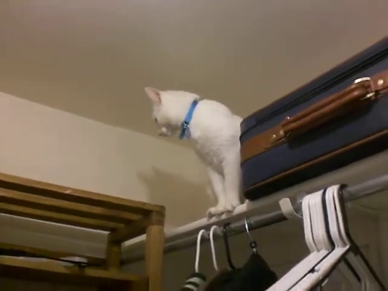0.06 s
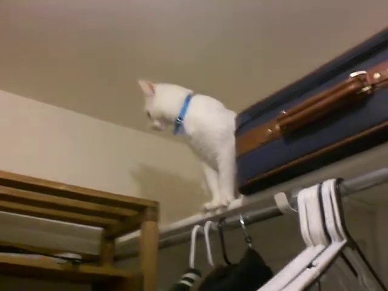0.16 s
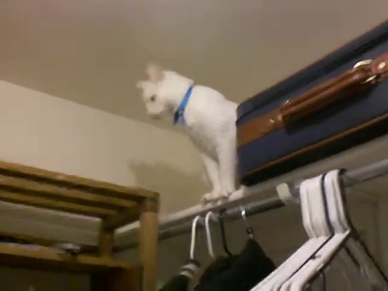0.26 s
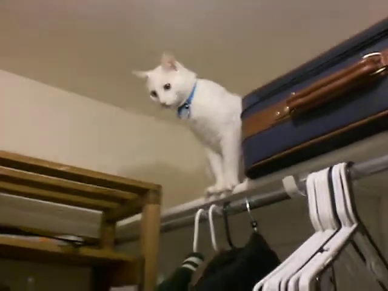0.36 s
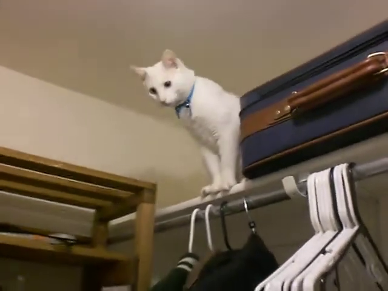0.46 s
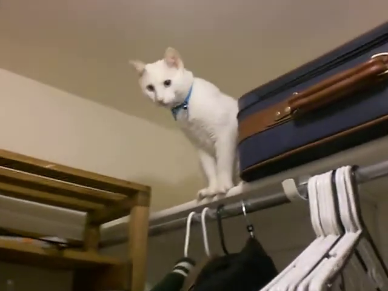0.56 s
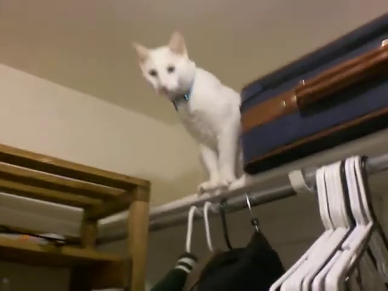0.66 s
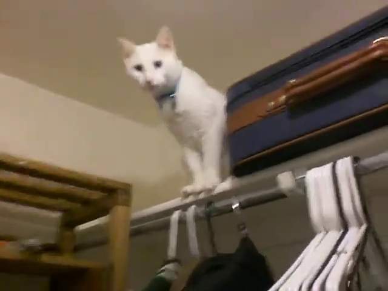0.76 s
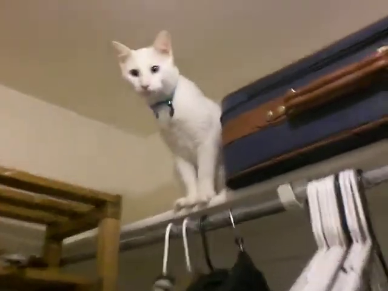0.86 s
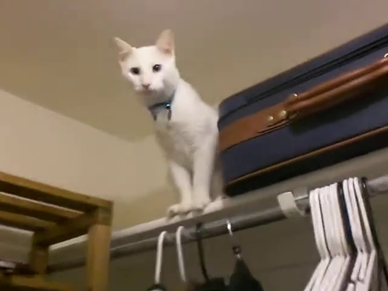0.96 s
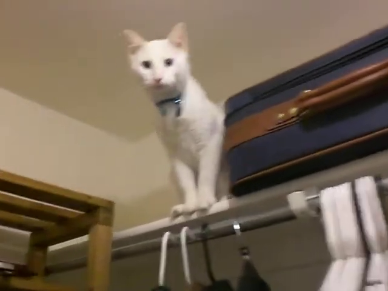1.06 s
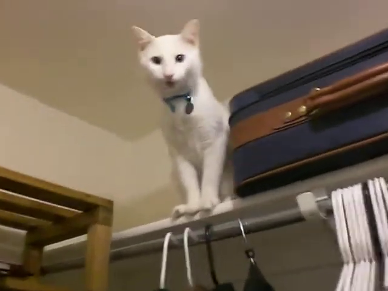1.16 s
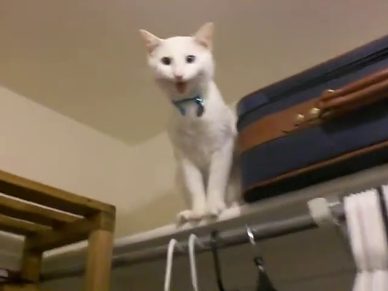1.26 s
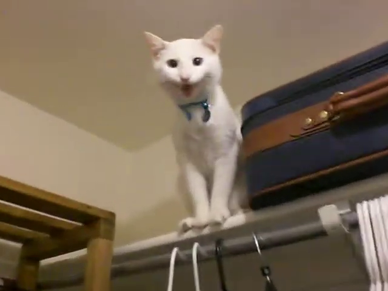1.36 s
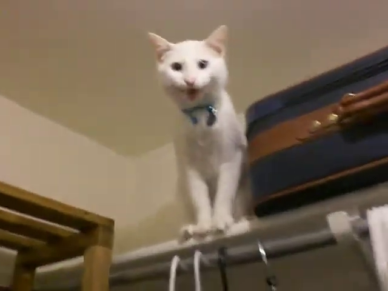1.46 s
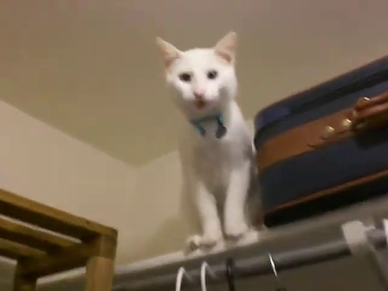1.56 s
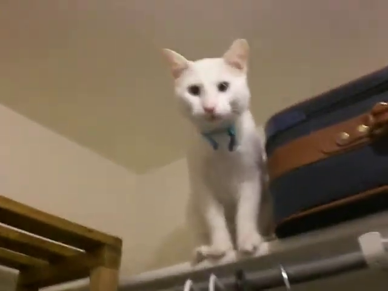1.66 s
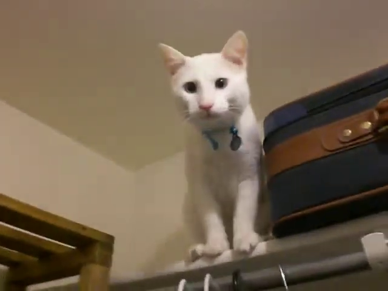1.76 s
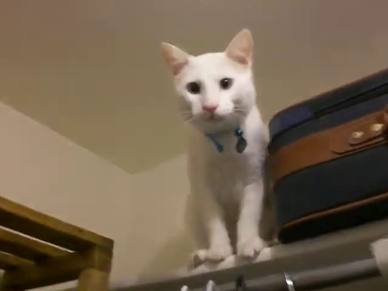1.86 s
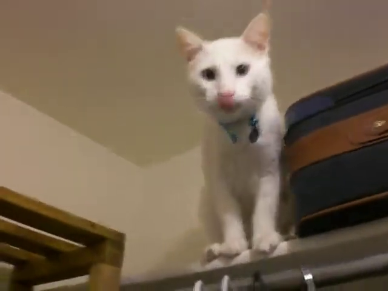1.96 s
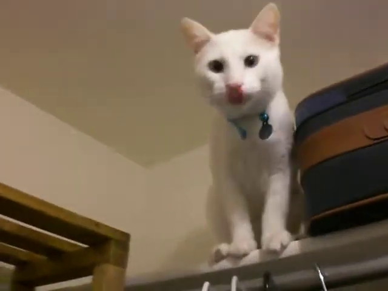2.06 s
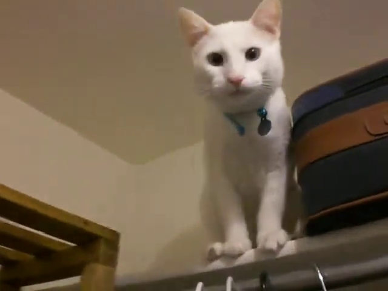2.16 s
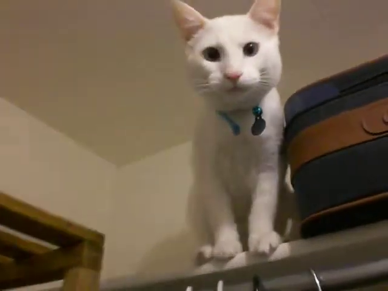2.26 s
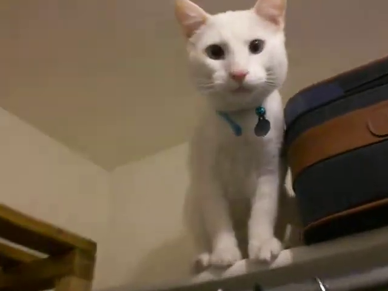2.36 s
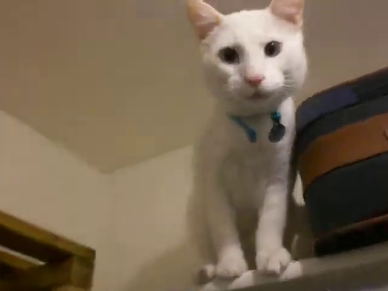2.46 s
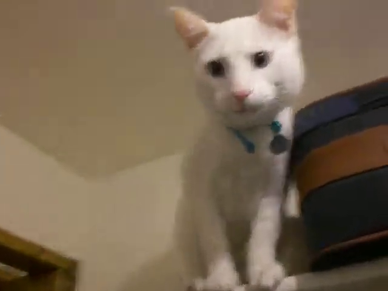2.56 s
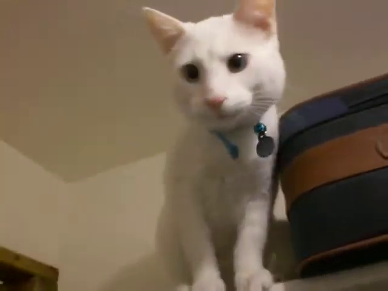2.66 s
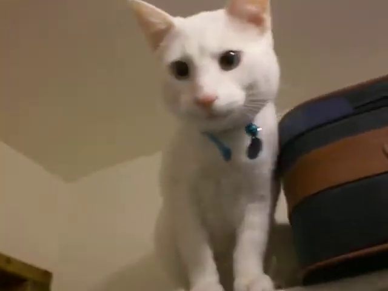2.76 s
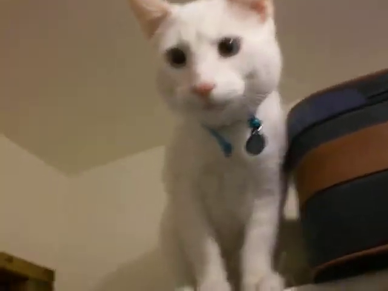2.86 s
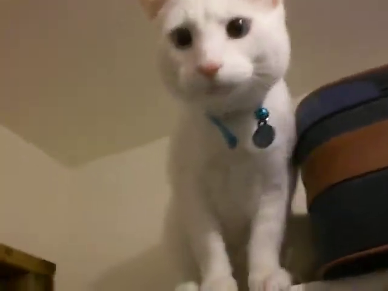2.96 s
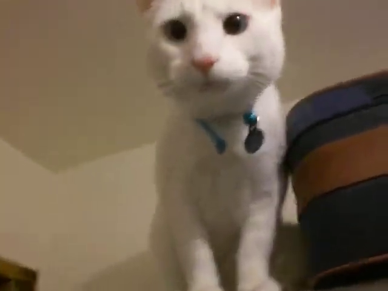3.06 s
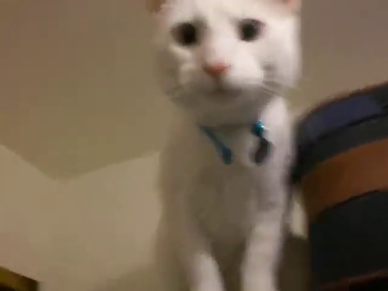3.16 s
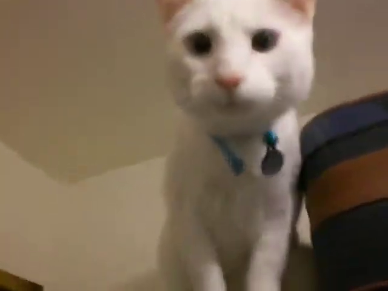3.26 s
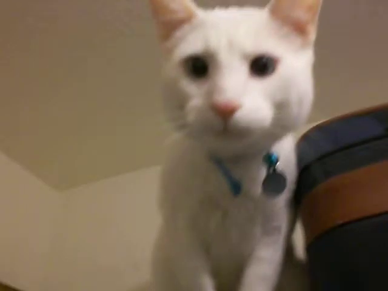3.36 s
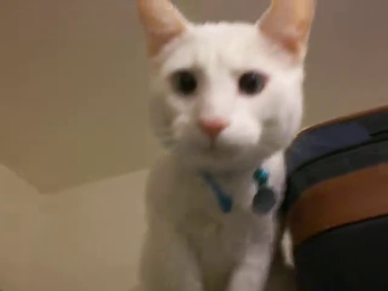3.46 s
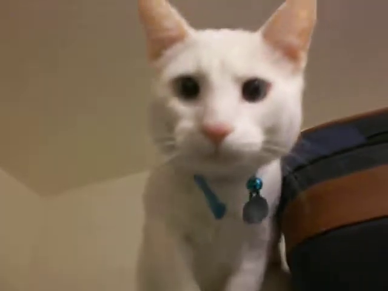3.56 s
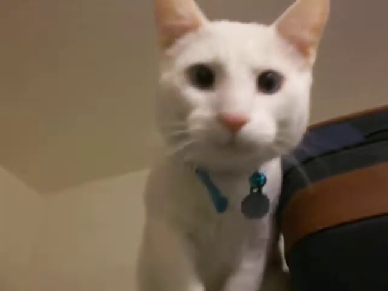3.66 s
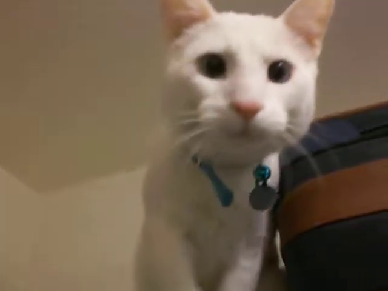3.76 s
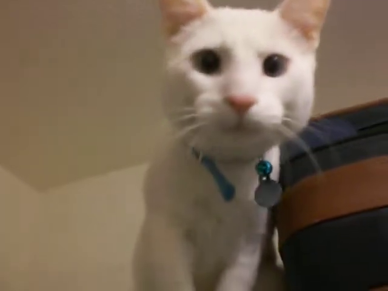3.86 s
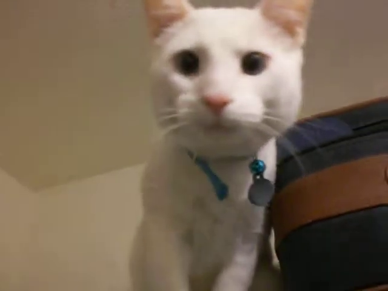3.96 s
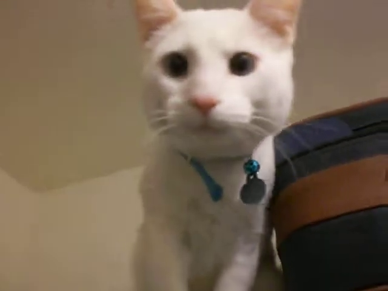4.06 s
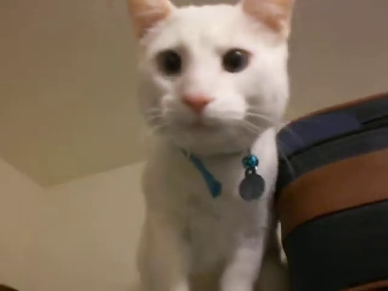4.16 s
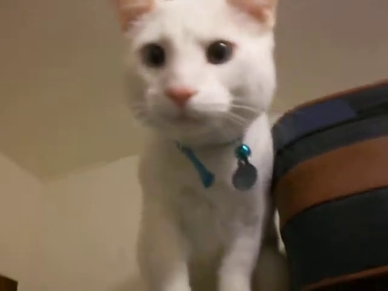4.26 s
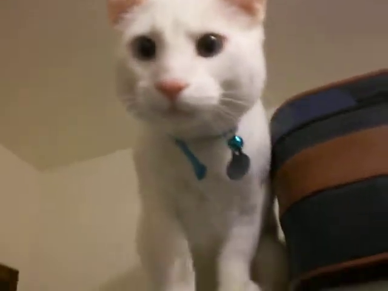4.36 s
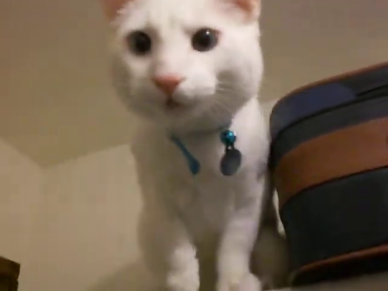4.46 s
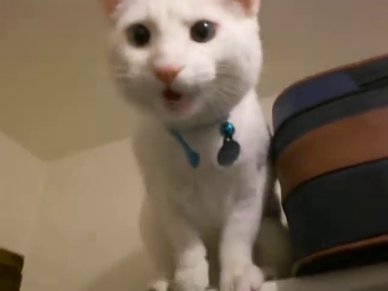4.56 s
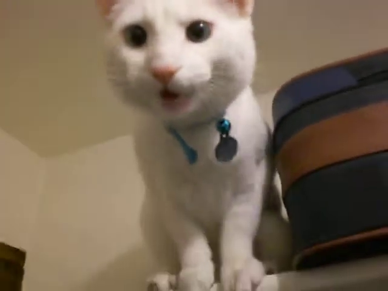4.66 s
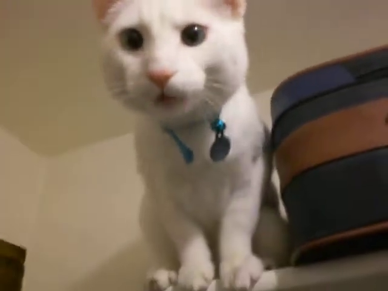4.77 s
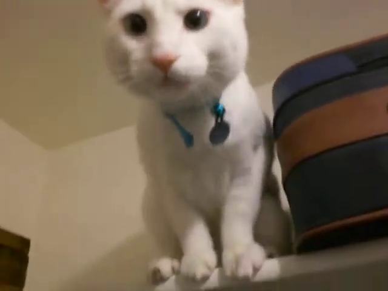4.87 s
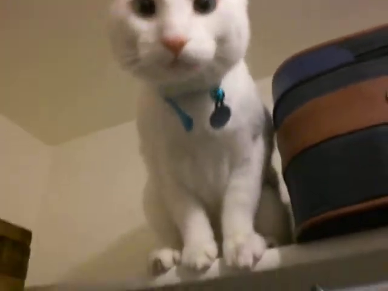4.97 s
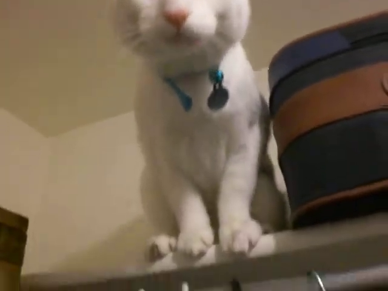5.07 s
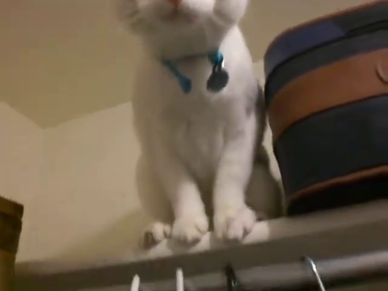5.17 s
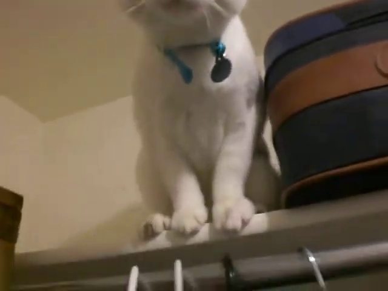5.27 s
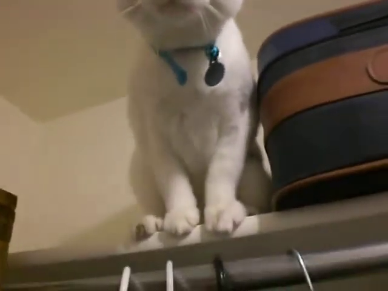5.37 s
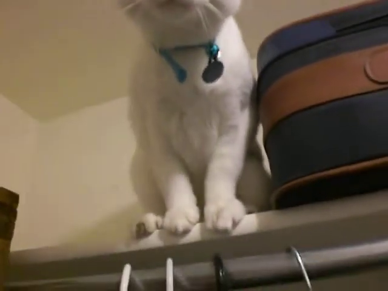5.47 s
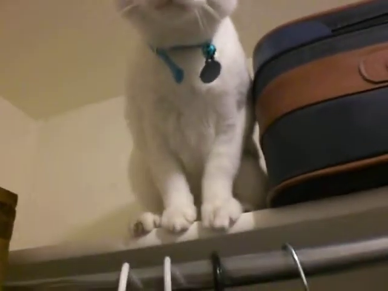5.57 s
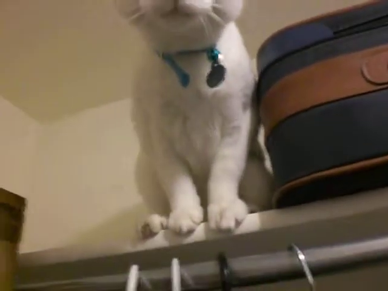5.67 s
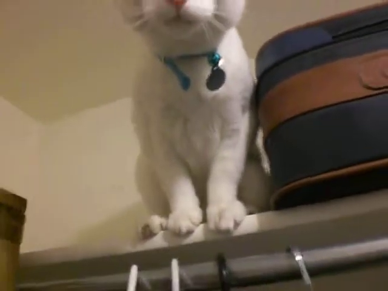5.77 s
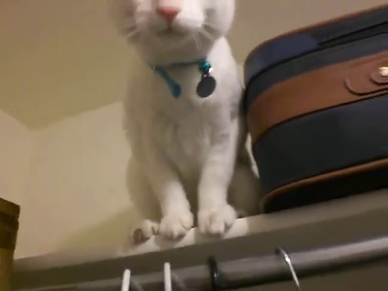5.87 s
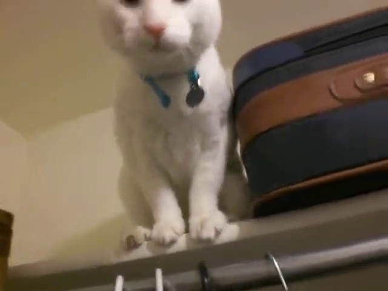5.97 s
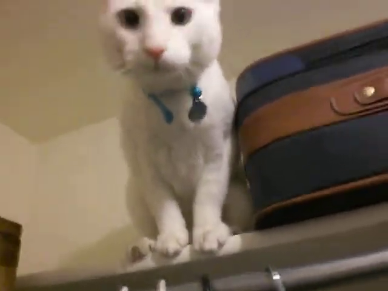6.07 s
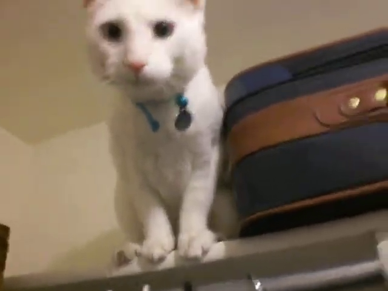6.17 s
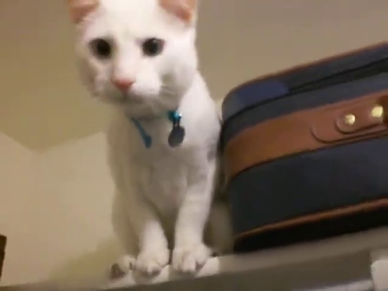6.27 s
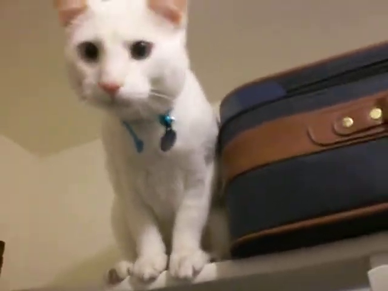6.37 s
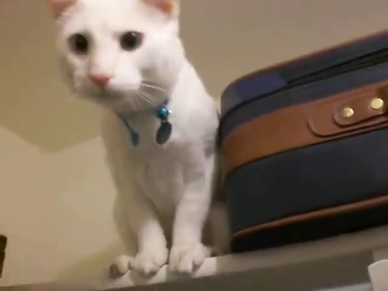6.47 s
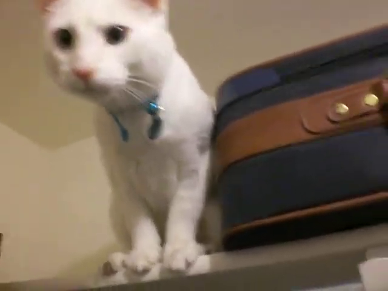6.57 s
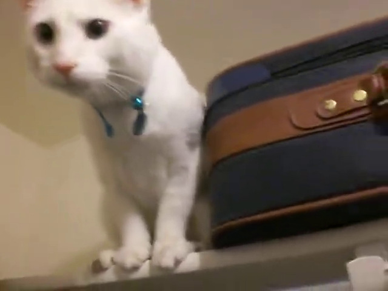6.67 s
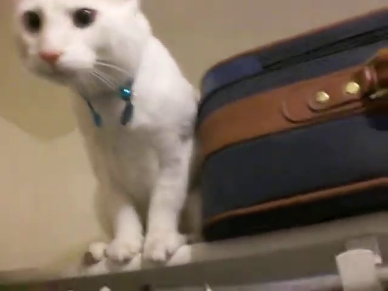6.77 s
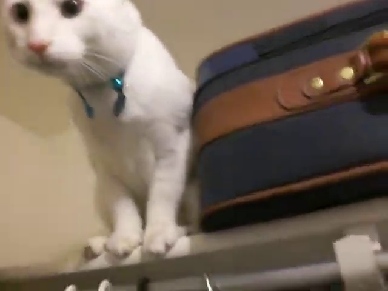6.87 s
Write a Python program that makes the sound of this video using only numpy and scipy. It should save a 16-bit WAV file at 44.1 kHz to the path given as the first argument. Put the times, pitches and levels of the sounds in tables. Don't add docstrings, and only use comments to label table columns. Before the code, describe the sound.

Quiet hiss and a very thin, high electronic whine hold throughout, in a small closet with close, short reflections. At about 1.15 s a faint lip smack leads into a high, clear meow from 1.2 to 1.8 s; it starts strong, drops quickly, levels, then slides down and turns breathy as the mouth closes, with a soft wet smack. A dull low bump sits near 1.7 s. From 2.1 to 2.8 s come light hand slides on the casing, small moist smacks, soft bumps and a dry tick at 2.7 s. Hiss alone follows until 4.4 s, when wet smacks and sharp clicks open the second meow; it begins softly, rises to a bright, full middle, and falls until 5.0 s, ending with two smacks. A tiny tap follows at 5.15 s. Around 5.8 to 6.0 s the hand rubs more strongly with low thuds, then only hiss and whine remain.

```python
import sys
import numpy as np
from scipy import signal
from scipy.fft import rfft, irfft
from scipy.io import wavfile
from scipy.ndimage import uniform_filter1d

SR = 44100
rng = np.random.default_rng(int(sys.argv[2]) if len(sys.argv) > 2 else 0)


def level_to_linear(level):
    exponent = np.asarray(level, float) / 20
    return 10 ** exponent


def generate_wav(sig):
    pcm = np.round(np.clip(np.atleast_2d(sig).T, -1, 1) * 32767).astype(np.int16)
    wavfile.write(sys.argv[1], SR, pcm)


N = 305613
TIME = np.arange(N) / SR


def at_hz(points, hz):
    point_hz, level_db = np.transpose(points)
    return np.interp(np.log(hz), np.log(point_hz), level_db)


def rms_one(x):
    return x / np.sqrt(np.mean(x ** 2) + 1e-20)


def drift(rate, size):
    r = np.exp(-2 * np.pi * rate / SR)
    wander = signal.lfilter([1], [1, -2 * r, r * r], rng.standard_normal(size + 4000))
    return rms_one(wander[4000:])


def resonance(x, hz, width):
    r = np.exp(-np.pi * width / SR)
    ring = [1, -2 * r * np.cos(2 * np.pi * hz / SR), r * r]
    return signal.lfilter(np.array([1, 0, -1]) * (1 - r * r) / 2, ring, x)


# (time [s], pitch [Hz])
PITCHES = [
    [(1.19, 808), (1.232, 707), (1.27, 698.8), (1.39, 716), (1.495, 706.6), (1.515, 692), (1.62, 671.2),
     (1.745, 599), (1.83, 474.6)],
    [(4.4, 635), (4.44, 642), (4.49, 620.7), (4.57, 693.7), (4.635, 711), (4.66, 702), (4.735, 697),
     (4.88, 625.7), (5.0, 529)],
]
# (time [s], effort [dB], leaking breath [dB])
EFFORTS = [
    [(1.19, -45.5, -30), (1.24, -54.5, -11), (1.3, -47.5, -24.5), (1.41, -44.5, -27), (1.49, -42.5, -24),
     (1.51, -45.5, -25), (1.535, -42, -34), (1.7, -47.5, -14), (1.83, -57.5, -11)],
    [(4.4, -73, -24), (4.43, -53, -22), (4.535, -47.5, -16), (4.6, -46.5, -29), (4.637, -44.5, -23),
     (4.655, -44.5, -32), (4.735, -47.5, -25), (4.8, -46.5, -24), (4.995, -55.5, -22)],
]
# (time [s], mouth opening [0-1])
JAWS = [
    [(1.19, 0.24), (1.21, 0.57), (1.225, 0.93), (1.255, 0.95), (1.32, 1), (1.6, 0.78), (1.7, 0.64),
     (1.76, 0.5), (1.83, 0)],
    [(4.4, .02), (4.47, 0.3), (4.529, 0.1), (4.533, 0.81), (4.58, 1), (4.74, 0.99), (4.82, 0.85),
     (4.9, 0.8), (5.0, 0.33)],
]
# (frequency [Hz], level [dB])
LOW_COLOURS = [
    [[(450, -4), (540, 5.5), (552, -6), (590, 0.5), (648, -9.5), (673, -17.5), (699, -7), (714, 0)],
     [(1000, -14), (1150, 7), (1200, 1), (1275, -17), (1320, -0.5), (1353, -16), (1385, -4), (1470, -9)],
     [(1600, 8.5), (1900, 1.5), (1970, 6.5), (2025, 6.5), (2060, 11.5), (2140, 6.5), (2200, -7), (2350, 7)]],
    [[(530, 2), (560, 2.5), (590, -3), (617, -7.5), (650, -0.5), (700, 0), (713, 2.5)], [(1070, 5),
     (1110, 6), (1250, -1), (1336, -10), (1390, -4), (1430, -0.5)], [(1600, 8), (1800, 1), (1920, -4),
     (1970, 9.5), (2035, 8), (2075, 10), (2112, 12.5), (2133, 6.5)]],
]
# (frequency [Hz], width [Hz], level when shut [dB], level when open [dB])
MOUTHS = [
    [(3710, 680, 14, 13), (4055, 60, -1, 10), (3353, 69, -13, -22), (5000, 67, -5, 7.5),
     (6000, 150, -12, -3)],
    [(4300, 570, 19, 7.5), (4295, 62, -8, 10.5), (5330, 144, 64, -7), (5300, 150, -9, 1),
     (4720, 99, 30, 3.5)],
]
# (frequency [Hz], level [dB])
THROATS = [
    [(1900, 19), (2800, 8), (3500, 2.5), (4200, -0.5), (4900, 4), (5600, 0.5), (6300, -4.5), (7000, -0.5),
     (7800, -12), (8600, -8), (9600, -9), (10800, -11), (12500, -17), (15000, -32)],
    [(1900, 3), (2800, 10), (3500, -4.5), (4200, -3.5), (4900, -5), (5700, -3), (6300, 3.5), (7000, -3.5),
     (7800, -3), (8600, -7), (9600, -9.5), (10800, -8), (12500, -23), (15000, -15)],
]
SHUT_LOSS_DB = (.1, 8, 25, 36)
UPPER_DB, BRIGHT_DB = -15, -1.5
LEAST_BREATH_DB = -40
ATTACK_S, RELEASE_S = .006, 0.0093
WAVER_DB = 1.5
SHELF_ECHO, SWAYS_PER_S = 0.51, 4.5


def meow(pitches, efforts, jaw, colours, mouth, throat):
    s, effort_db, breath_db = np.transpose(efforts)
    first, last = round(s[0] * SR), round(s[-1] * SR)
    t = TIME[first:last]
    size = len(t)
    effort_db = np.interp(t, s, effort_db)
    breath_db = np.interp(t, s, breath_db)
    shut = 1 - np.interp(t, *np.transpose(jaw))
    pitch = uniform_filter1d(np.interp(t, *np.transpose(pitches)), size=700)

    low = []
    for k, colour in enumerate(colours, 1):
        waver_db = WAVER_DB / k * drift(30, size)
        low.append(at_hz(colour, k * pitch) - SHUT_LOSS_DB[k - 1] * shut + waver_db)

    pitch = pitch * (1 + 0.00337 * drift(60, size))
    turn = 2 * np.pi * np.cumsum(pitch) / SR

    orders = np.arange(4, 22)[:, None]
    upper_hz = orders * pitch
    tilt = BRIGHT_DB * np.log2(np.minimum(orders, 10) / 6)
    upper = UPPER_DB - SHUT_LOSS_DB[-1] * shut + at_hz(throat, upper_hz) + tilt
    for hz, width, shut_db, open_db in mouth:
        peak_db = open_db + (shut_db - open_db) * shut
        upper = upper + peak_db / (1 + ((upper_hz - hz) / width) ** 2)
    sway = np.array([np.pi / 16 * min(k, 6) * drift(SWAYS_PER_S, size) for k in orders[:, 0]])
    beating = np.abs(1 + SHELF_ECHO * np.exp(1j * sway)) / (1 + SHELF_ECHO ** 2)
    upper = upper + 20 * np.log10(beating)

    breath_db = breath_db + 19 * np.exp(-(s[-1] - t) / .03)
    voice = 0
    for k, level_db in enumerate(effort_db + np.vstack([low, upper]), 1):
        flutter_db = .055 * min(k, 7) ** 2 * drift(35, size)
        angle = k * turn + 0.88 * np.minimum(k, 6) ** 1.53
        skirt = drift(306, size) * np.cos(angle) + drift(410, size) * np.sin(angle)
        skirt_db = np.maximum(breath_db, LEAST_BREATH_DB + 2 * min(k, 9)) - 13 + 9 * np.log2(k)
        partial = np.sqrt(2) * np.cos(angle) + np.minimum(level_to_linear(skirt_db), 1.5) * skirt
        voice = voice - level_to_linear(level_db + flutter_db) * partial

    fade = np.minimum((t - s[0]) / ATTACK_S, (s[-1] - t) / RELEASE_S)
    out = np.zeros(N)
    out[first:last] = voice * np.clip(fade, 0, 1)
    return out


# (time [s], peak level [dB], ring [Hz], width [Hz], decay [s])
SMACKS = [(1.152, -61.5, 4300, 3000, 0.056), (1.776, -58.5, 4370, 1500, 0.083),
          (1.784, -57.5, 595, 1200, 0.11), (1.79, -67.5, 7350, 5000, 0.31), (2.205, -57, 795, 600, 0.035),
          (2.204, -64, 3500, 4000, 0.09), (2.25, -56, 1380, 1200, 0.073), (2.256, -61, 1900, 1100, 0.18),
          (2.255, -56, 4300, 2000, .03), (4.3982, -46.5, 780, 346, 0.039), (4.4003, -48, 1500, 600, 0.018),
          (4.411, -76, 4370, 700, 0.43), (4.4836, -41.5, 2350, 1200, 0.033), (4.498, -52, 5200, 1800, 0.06),
          (4.499, -54, 3200, 2500, 0.032), (4.512, -58, 5230, 1500, 0.033), (4.99, -58, 1000, 1270, 0.13),
          (4.994, -68.5, 6470, 1500, .25), (5.0, -69.5, 10000, 4000, .25)]
# (time [s], peak level [dB], ring [Hz], width [Hz])
TICKS = [(2.709, -50, 4000, 3500), (4.4646, -45, 2000, 4000), (4.4775, -47, 7500, 5000),
         (4.486, -40, 6000, 7000), (4.4858, -38, 5000, 2500), (4.487, -31, 3500, 6000),
         (4.4925, -43, 2680, 1500), (4.496, -40, 3500, 5000), (4.5318, -40, 2700, 1500),
         (4.987, -41.5, 1610, 900), (4.988, -43.5, 4000, 3500)]
TICK_DECAY_S = 0.015
FIZZ_DB, FIZZ_S = 10, 0.074


def smacks():
    out, t = np.zeros(N), TIME[:6000]
    click = 1.0 * (t == 0)
    rows = [(*tick, TICK_DECAY_S) for tick in TICKS] + list(SMACKS)
    for s, peak_db, hz, width, decay in rows:
        noise = rng.standard_normal(6000)
        snap = resonance(resonance(click, hz, width), hz, width)
        fizz = rms_one(resonance(resonance(noise, hz, width), hz, width))
        fizz = fizz * level_to_linear(FIZZ_DB - 60 * t / decay) / (1 + FIZZ_S / decay)
        out[round(s * SR):][:6000] += level_to_linear(peak_db) * (snap / np.max(np.abs(snap)) + fizz)
    return out


# (start [s], press time [s], let-go time [s], peak level [dB])
RUBS = [
    (2.12, .026, .05, -61),
    (2.198, 0.0055, 0.079, -60),
    (2.49, 0.084, 0.24, -53),
    (2.6, 0.051, 0.1, -60),
    (2.675, 0.021, .06, -55),
    (5.79, 0.04, .1, -54),
    (5.82, 0.049, 0.09, -43),
    (5.95, 0.035, .1, -52.5),
    (5.97, 0.043, 0.077, -50),
]
# (frequency [Hz], width [Hz], level [dB])
CASING = [(217, 31, -20.5), (447, 160, -10.5), (701, 24, -9), (930, 115, -12.5), (1310, 750, -9.5),
          (1980, 290, -10.5), (2700, 460, -17), (3220, 390, -7), (5000, 5200, -9)]
# (time [s], peak level [dB], pitch [Hz], decay [s])
KNOCKS = [
    (1.661, -52, 64, 0.078),
    (2.352, -50, 69, 0.13),
    (2.398, -49, 200, 0.01),
    (5.862, -49, 69.6, 0.3),
    (5.87, -51.5, 205, 0.23),
    (5.94, -48, 45, 0.067),
    (5.147, -52, 350, 0.022),
]
RUB_SWING_DB = 23


def handling():
    grains = rng.standard_normal(N) * level_to_linear(1.5 * drift(60, N))
    rubs_db = []
    for s, press, let_go, db in RUBS:
        from_peak = TIME - s - press
        rubs_db.append(db - RUB_SWING_DB * np.maximum(-from_peak / press, from_peak / let_go))
    rub_db = np.max(rubs_db, axis=0)
    pressure_db = np.maximum(rub_db + 65.0, 0)

    plain, dulled = 0, 0
    for k, (hz, width, db) in enumerate(CASING):
        mode = level_to_linear(db) * (-1) ** k * resonance(grains, hz, width) * np.sqrt(100 / width)
        plain = plain + mode
        dulled = dulled + mode * level_to_linear(-.25 * pressure_db * np.log2(max(hz / 700, 1)))
    out = level_to_linear(rub_db) * dulled / np.std(plain)

    for s, peak_db, hz, decay in KNOCKS:
        t = np.clip(TIME - s, 0, 1)
        out += level_to_linear(peak_db - 60 * t / decay) * np.sin(2 * np.pi * hz * t)
    return out


# (delay [s], level [dB])
ECHOES = [
    (.0021, -83),
    (.0047, -23),
    (.0083, -17.5),
    (.0131, -43),
]
CLOSET_T60_S, CLOSET_DB = 0.089, -18


def closet(x):
    t = TIME[:round(.3 * SR)]
    tail = resonance(rng.standard_normal(len(t)), 1100, 4100)
    tail = tail * level_to_linear(-60 * t / CLOSET_T60_S) * (t > .012)
    reply = level_to_linear(CLOSET_DB) * tail / np.sqrt(np.sum(tail ** 2))
    reply[0] = 1
    for s, db in ECHOES:
        reply[round(s * SR)] += level_to_linear(db)
    return signal.fftconvolve(x, reply / np.sqrt(np.sum(reply ** 2)))[:N]


# (frequency [Hz], level [dB per Hz])
HISS = [(12, 4), (25, -8), (44, -11.5), (100, -10), (250, -8), (500, -10.5), (800, -12.5), (1500, -16),
        (3000, -19), (6000, -21.5), (10000, -22.5), (13500, -22.5), (16500, -22.5)]
HISS_DB = -59
WHINE_HZ, BLANK_TONE_HZ, TOP_LINE_HZ = 14505.53, 14150, 15734.3
WHINE_DB, HALF_WHINE_DB, BLANK_TONE_DB, TOP_LINE_DB = -62.6, -78, -64, -81.5
FRAME_HZ, RESTART_RAD, BLANK_S = 29.97, 1.25, .0011


def electronics():
    hz = np.maximum(np.fft.rfftfreq(N, 1 / SR), 1)
    hiss_spectrum = rfft(rng.standard_normal(N)) * level_to_linear(at_hz(HISS, hz)) * (hz > 8)
    hiss = rms_one(irfft(hiss_spectrum, N))
    in_frame = TIME * FRAME_HZ % 1
    blank = in_frame < BLANK_S * FRAME_HZ
    turn = 2 * np.pi * WHINE_HZ * TIME - RESTART_RAD * in_frame
    reading = level_to_linear(WHINE_DB) * np.sin(turn) + level_to_linear(HALF_WHINE_DB) * np.sin(turn / 2)
    blank_turn = turn - 2 * np.pi * (WHINE_HZ - BLANK_TONE_HZ) * in_frame / FRAME_HZ
    resting = level_to_linear(BLANK_TONE_DB) * np.sin(blank_turn)
    line = level_to_linear(TOP_LINE_DB) * np.sin(2 * np.pi * TOP_LINE_HZ * TIME)
    return level_to_linear(HISS_DB) * hiss + np.sqrt(2) * (np.where(blank, resting, reading) + line)


SLIPS_PER_S, SLIP_DB = 5.4, -77


def channel_slips():
    size = 2048
    out = np.zeros(N + size)
    fade = np.kaiser(size, 4 * np.pi) ** .25
    for when, pitch in rng.random((round(SLIPS_PER_S * N / SR), 2)):
        low_hz = 4500 + 9000 * pitch ** .7
        band = signal.butter(6, [low_hz, low_hz + 1300], "band", fs=SR, output="sos")
        at = 860 + int(when * (N // 1024 - 1)) * 1024
        burst = rms_one(signal.sosfilt(band, rng.standard_normal(size)))
        out[at:at + size] += level_to_linear(SLIP_DB) * burst * fade
    return out[:N] * [[1], [-1]]


def scene():
    calls = zip(PITCHES, EFFORTS, JAWS, LOW_COLOURS, MOUTHS, THROATS)
    cat = sum(meow(*call) for call in calls) + smacks()
    return np.tile(closet(cat) + handling() + electronics(), (2, 1))


def low_pass(x):
    return signal.sosfilt(signal.butter(12, 15760, fs=SR, output="sos"), x)


# (frequency [Hz], width [Hz], level [dB])
HISS_GAPS = [
    (7290, 120, -11),
    (7870, 150, -11),
]


def record(dry):
    for hz, width, db in HISS_GAPS:
        dry = dry - (1 - level_to_linear(db)) * resonance(dry, hz, width)
    return low_pass(dry + channel_slips())


dry = scene()
out = record(dry)
generate_wav(out)
```